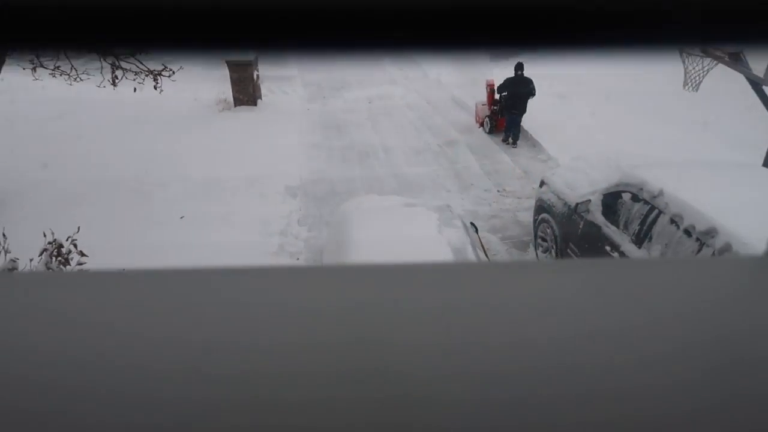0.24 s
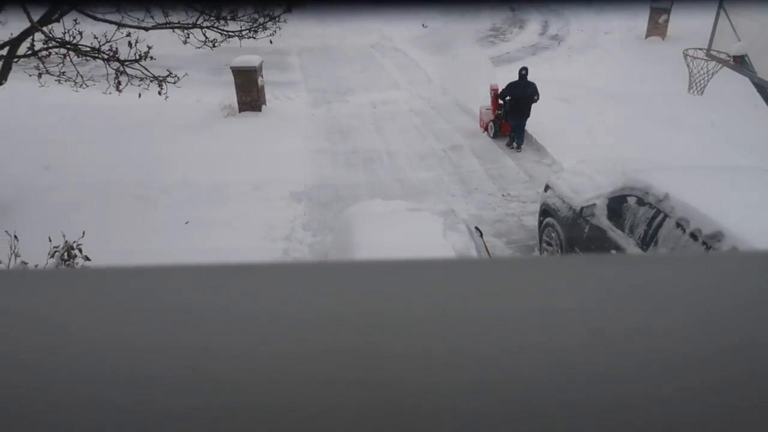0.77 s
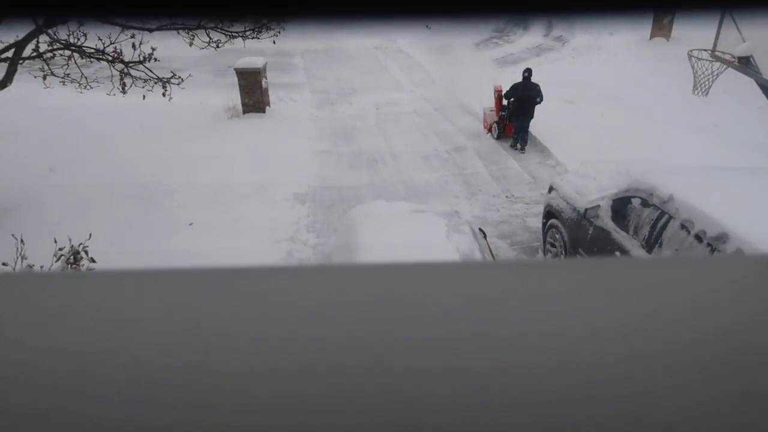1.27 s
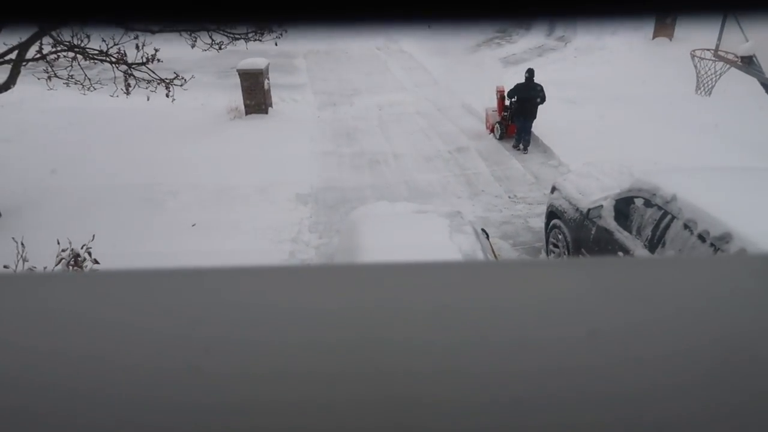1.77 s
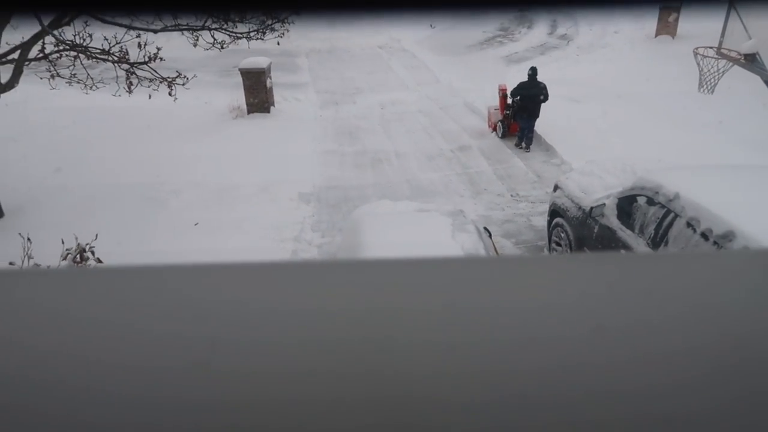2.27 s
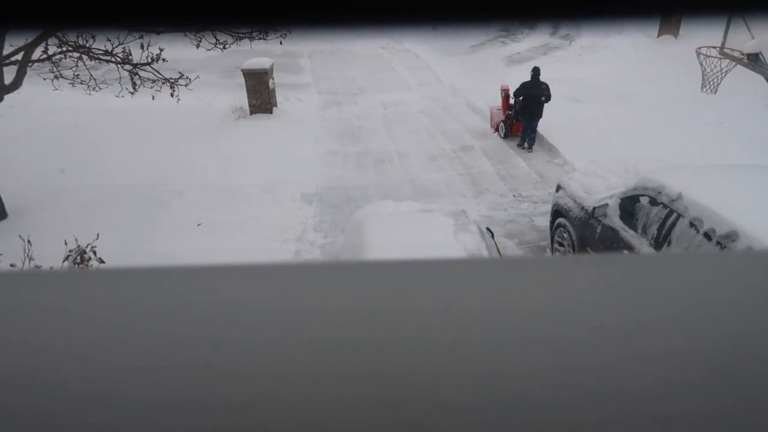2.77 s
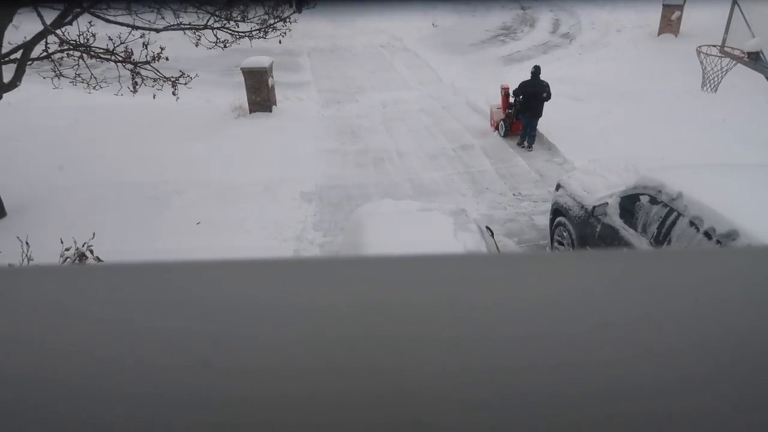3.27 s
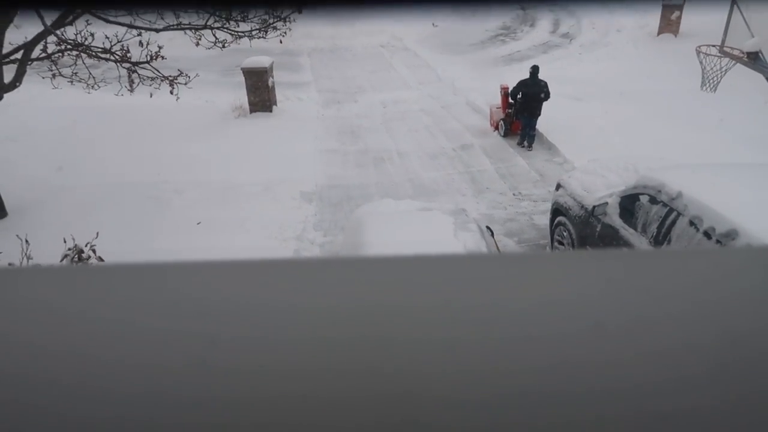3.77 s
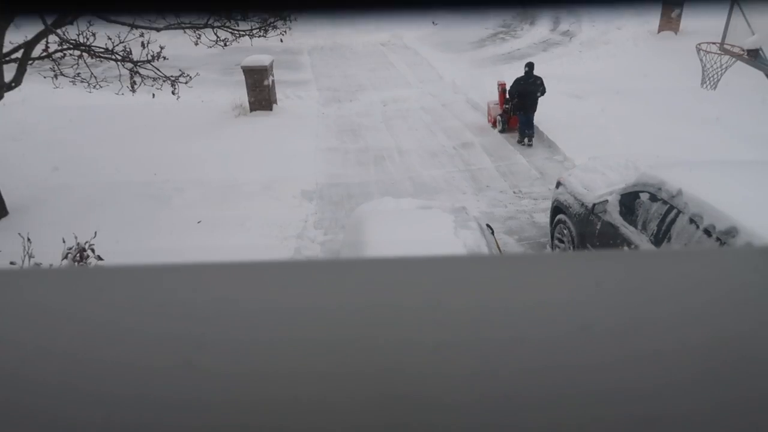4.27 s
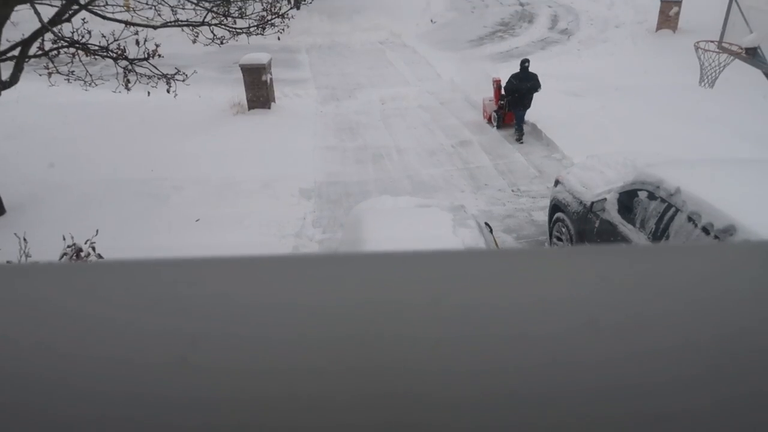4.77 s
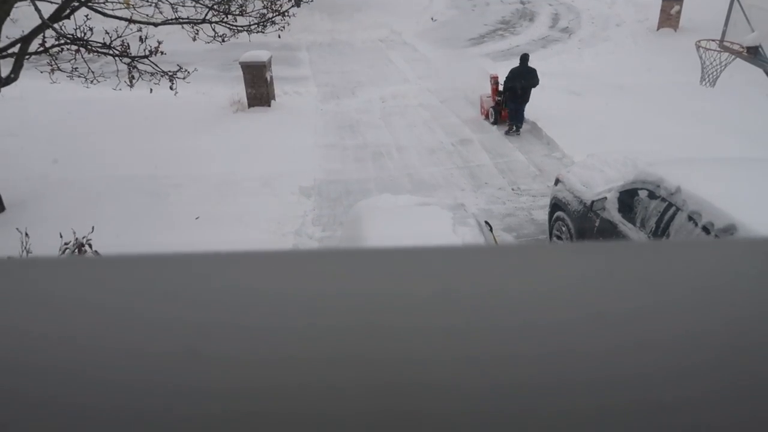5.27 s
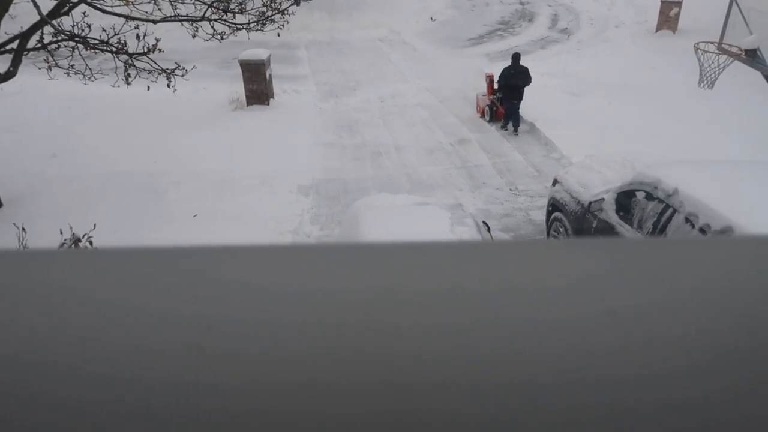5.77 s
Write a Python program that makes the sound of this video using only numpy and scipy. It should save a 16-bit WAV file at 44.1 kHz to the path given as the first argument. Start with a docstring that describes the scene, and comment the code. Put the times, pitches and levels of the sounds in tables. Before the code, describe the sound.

From inside a house, a single-cylinder snowblower is heard working down a snowy driveway, a muffled low drone with sheet-metal rattle and a wavering impeller whine. It holds steady for about four seconds, then drops slightly in pitch and grows thicker as the snow deepens. An appliance hums steadily indoors, two faint ticks come close by midway and another near the end, over soft microphone hiss.

```python
"""A single-cylinder snowblower works down a driveway, heard from indoors through an upstairs window.
Engine harmonics make a drone that sags and thickens in deeper snow; firings ring muffler, room and housing.
The impeller whines, lumps of snow knock in the rattling housing, and spray and rumble grow with the load.
Indoors an appliance hums in steady tones and three faint ticks ring a small hard object close by.
The microphone adds coloured hiss and a thin electronic whistle."""
import sys
import numpy as np
from scipy.fft import rfft, irfft, next_fast_len
from scipy.io import wavfile
from scipy.ndimage import map_coordinates

SR = 44100
rng = np.random.default_rng(int(sys.argv[2]) if len(sys.argv) > 2 else 0)


def file_out(sig):
    """Save sig as 16-bit WAV at sys.argv[1]."""
    # one column per channel
    cols = np.atleast_2d(sig).T
    # limit, then scale
    lim = np.clip(cols, -1, 1)
    pcm = np.round(lim * 32767).astype(np.int16)
    wavfile.write(sys.argv[1], SR, pcm)


N = 266364  # samples


def amp(db):
    """Decibels to gain."""
    return 10 ** (np.asarray(db) / 20)


def unit(x):
    """Scale to rms 1."""
    return x / np.sqrt(np.mean(x ** 2) + 1e-20)


def along(points, hz):
    """Read a table of (Hz, value) points along a log frequency axis."""
    point_hz, value = np.transpose(points)
    return np.interp(np.log(hz + 1), np.log(point_hz + 1), value)


def curves(rows):
    """One value per sample for each column after the time."""
    s, *columns = np.transpose(rows)
    return [np.interp(np.arange(N) / SR, s, column) for column in columns]


def wobble(rate):
    """A smooth random curve with rate knots a second."""
    knots = rng.standard_normal(int(N * rate / SR) + 4)
    coarse = np.arange(0, N + 64, 64)
    return np.interp(np.arange(N), coarse, map_coordinates(knots, [coarse * rate / SR]))


def filtered(x, response):
    """Multiply the spectrum of x by a complex response of frequency."""
    padded = next_fast_len(N + SR // 2)
    spectrum = rfft(x, padded) * response(np.fft.rfftfreq(padded, 1 / SR))
    return irfft(spectrum, padded)[..., :N]


def resonance(f, hz, width):
    """A causal resonance with steep skirts: two equal band-passes in a row, each of this width."""
    return (1j * f * width / (hz * hz - f * f + 1j * f * width)) ** 2


def tone(cycles):
    """A sinusoid of rms 1 from its running count of cycles."""
    return np.sqrt(2) * np.cos(2 * np.pi * cycles)


# Stereo width at the microphone: (frequency_hz, side_against_mid_db)
SIDE_WIDTH = [(60, -29), (170, -15.5), (300, -13.5), (500, -7), (1000, -4.5), (2000, 0), (4000, 1.5),
              (8000, 0), (13000, -0.5)]


def stereo(pair):
    """From mid and side: bass reaches both microphone ports alike, treble does not."""
    mid = pair[0]
    side = filtered(pair[1], lambda f: amp(along(SIDE_WIDTH, f)))
    return np.array([mid + side, mid - side])


def noise(spectrum):
    """Diffuse stereo noise of the given colour."""
    white = rng.standard_normal((2, N))
    return stereo(unit(filtered(white, lambda f: amp(along(spectrum, f)))))


# The engine under its governor, before jitter and hunting: (time_s, firing_rate_hz)
ENGINE_SPEED = [(0.0, 29.39), (0.2, 29.54), (0.4, 29.28), (0.62, 29.73), (0.9, 29.56), (1.4, 29.72),
                (2.0, 29.73), (2.4, 29.65), (3.1, 29.88), (3.5, 29.79), (3.8, 29.77), (4.15, 29.57),
                (4.45, 29.18), (4.8, 28.44), (5.25, 28.43), (5.7, 28.0), (6.04, 28.14)]


def snowblower(jitter=0.0049, hunting=0.0018, uneven_db=0.64):
    """Speed and load drive the engine's parts; the governor hunts a little and no two strokes are quite alike."""
    speed, = curves(ENGINE_SPEED)
    load = engine_load(speed)
    cycles = np.cumsum(speed) / SR + .27
    cycles = cycles + jitter * wobble(14) + hunting * wobble(3)  # both in firing periods
    strength = amp(uneven_db * wobble(FREE_HZ))
    engine = strength * drone(cycles, speed, load) + clatter(cycles, load)
    return engine + impeller() + lumps() + spray(load) + rumble(load)


FREE_HZ, LOADED_HZ = 29.91, 27.58  # firing rate in light and in deep snow
LOAD_CURVE = 1.11  # above 1, a slight droop means very little load


def engine_load(speed):
    """The governor lets the speed droop with the load: 0 in light snow, 1 in deep snow."""
    droop = (FREE_HZ - speed) / (FREE_HZ - LOADED_HZ)
    return np.clip(droop, 0, 1) ** LOAD_CURVE


# Exhaust drone before boom and waver: (multiple_of_firing_rate, light_snow_db, deep_snow_db)
DRONE_HARMONICS = [(2, -67.5, -43), (3, -44.5, -67), (4, -38, -43), (5, -38, -43.5), (6, -42, -45.5),
                   (7, -49, -38), (8, -51, -76.5), (9, -53, -44), (10, -46.5, -41.5), (12, -65, -87.5),
                   (14, -64.5, -79), (15, -74, -63.5), (16, -80, -51.5), (18, -64, -63.5), (19, -78, -56),
                   (24, -68, -74), (27, -76.5, -73), (28, -69, -79), (29, -71.5, -74), (33, -83.5, -82.5)]
# Room modes that boom when a harmonic slides onto them: (frequency_hz, width_hz, boost_db)
ROOM_MODES = [(169.8, 3.2, 10), (205.5, 3, 5), (238.5, 5, 9.5), (281.8, 5, 9), (292, 5, 2),
              (341.7, 5.5, 25), (706, 8, 3)]
# The loud boom near 280 Hz swells and fades, added to one harmonic: (time_s, level_db)
BOOM_LEVEL = [(4.3, 0), (4.45, 3.5), (4.68, 4), (4.84, -6), (4.98, -7), (5.07, 0), (5.17, -7), (5.34, 3),
              (5.46, 1), (5.55, -8), (5.62, 2), (5.67, 2), (5.715, -10), (5.77, 1), (5.9, 4.5), (5.97, 1),
              (6.01, -9)]
BOOM_MULTIPLE = 10
OVERTONE_BLUR, OVERTONE_WAVER_DB = .006, .6  # phase in cycles per loose multiple, level per its root


def drone(cycles, speed, load, waver_db=0.76):
    """Clean engine harmonics; the high ones arrive later and waver more."""
    smear, exhaust_lead, tight = .15, .18, 8  # cycles, cycles, highest tightly locked multiple
    out = np.zeros(N)
    for multiple, light_db, deep_db in DRONE_HARMONICS:
        k = round(multiple)
        boom_db = sum(db / (1 + (2 * (k * speed - hz) / width) ** 2) for hz, width, db in ROOM_MODES)
        if k == BOOM_MULTIPLE:
            boom_db = boom_db + curves(BOOM_LEVEL)[0]
        load_db = light_db + (deep_db - light_db) * load
        level = amp(load_db + boom_db + waver_db * np.sqrt(k) / 2 * wobble(3.98))
        loose = max(k - tight, 0)
        # even multiples follow the crank, odd ones only the exhaust: two uneven beats per firing
        lag = smear * loose ** 2 - exhaust_lead * (k % 2)
        level = level * amp(OVERTONE_WAVER_DB * np.sqrt(loose) * wobble(9.8))
        out += level * tone(k * cycles - lag + OVERTONE_BLUR * loose * wobble(12))
    return out


# Room, muffler and housing: (frequency_hz, width_hz, light_snow_db, deep_snow_db, roughness_0_to_1)
BODY_RESONANCES = [(58.4, 13, -56.5, -54, 0.95), (98, 1.5, -62, -38.5, 0.9), (181.6, 15, -48, -51, 1),
                   (197.7, 7.9, -60, -42.5, 0.91), (249.1, 13, -57, -37, 0.4),
                   (277.86, 15.5, -45.5, -44.5, 0.96), (333, 63, -68.5, -58.5, 0.7),
                   (468.5, 108, -57, -58.5, 0.7), (536.4, 34, -65.5, -66.5, 1), (751, 83, -70.5, -75, 0.8),
                   (1240, 950, -74, -60.5, 0.94), (3970, 200, -92.5, -73, .8), (5360, 470, -89, -76, 1)]


def clatter(cycles, load):
    """The firings shake muffler and housing; each resonance changes level with the load."""
    pulses, puffs = firings(cycles)
    body = sum(amp(light_db + (deep_db - light_db) * load) * ring(pulses, puffs, hz, width, rough)
               for hz, width, light_db, deep_db, rough in BODY_RESONANCES)
    return stereo(body + housing(cycles, pulses, puffs))


COMBUSTION_LEAD = .1  # combustion comes this share of a firing period before the exhaust thump


def firings(cycles, burst=0.11, between=0.32, scatter_db=2):
    """Each firing gives a direct pulse, in the middle only, and a diffuse burst of turbulence as mid and side."""
    since = (cycles + COMBUSTION_LEAD) % 1  # firing periods since combustion
    starts = np.flatnonzero(np.diff(since) < 0)
    pulses = np.zeros(N)
    pulses[starts] = amp(scatter_db * rng.standard_normal(N)[:len(starts)])
    puffs = rng.standard_normal((2, N)) * (between + np.exp(-since / burst))
    return np.array([unit(pulses), np.zeros(N)]), unit(puffs)


def ring(pulses, puffs, hz, width, rough):
    """One resonance kept ringing by the firings, at rms 1 in the middle."""
    rough = np.clip(rough, 0, 1)
    force = np.sqrt(1 - rough) * pulses + np.sqrt(rough) * puffs
    pair = filtered(force, lambda f: resonance(f, hz, width))
    return pair / np.std(pair[0])


# The sheet-metal housing's ringing: (time_s, level_db, main_mode_pitch_hz)
HOUSING_RATTLE = [(0.0, -63, 1312), (0.35, -60.5, 1312), (0.7, -67, 1325), (2.5, -66, 1310),
                  (3.1, -71, 1315), (4.3, -69.5, 1322), (4.75, -65, 1298), (5.12, -61.5, 1298),
                  (5.24, -61, 1328), (6.04, -62.5, 1328)]
# What the housing rings with, as relative levels: (frequency_hz, width_hz, level_db)
HOUSING_MODES = [(1300, 85, -1), (1470, 82, -17.5), (1583, 68, -14), (1915, 84, -13)]
RATTLE_FALL, RATTLE_RISE = .42, .12  # decay and attack of each shake, firing periods
RATTLE_SCATTER_DB = 1.6  # unevenness of the shakes


def housing(cycles, pulses, puffs, ring_db=-4.0, scrape_db=-7, wander=0.15):
    """Firings shake the sheet metal: its main mode flutters in time with the engine, over a looser buzz."""
    level_db, ring_hz = curves(HOUSING_RATTLE)
    since = (cycles + COMBUSTION_LEAD) % 1
    # the attack term is scaled so that each shake starts where the last one ended
    attack = (1 - np.exp(-1 / RATTLE_FALL)) * np.exp(-since / RATTLE_RISE)
    shake = (np.exp(-since / RATTLE_FALL) - attack) * amp(RATTLE_SCATTER_DB * wobble(FREE_HZ))
    ring_cycles = np.cumsum(ring_hz) / SR
    main = np.array([unit(shake * tone(ring_cycles + wander * wobble(FREE_HZ))) for _ in range(2)])
    buzz = sum(amp(db) * ring(pulses, puffs, hz, width, rough=0.58) for hz, width, db in HOUSING_MODES)
    return amp(level_db) * (amp(ring_db) * main + amp(scrape_db) * buzz)


# The impeller before its flutter: (time_s, whine_hz, level_db)
IMPELLER_WHINE = [(0.0, 467, -59), (0.15, 467, -60), (0.2, 479, -53), (0.42, 477, -55), (0.7, 469, -60),
                  (0.95, 464, -58), (1.1, 476, -57), (1.25, 462, -56), (1.45, 460, -54), (1.7, 475, -62),
                  (1.95, 461, -54), (2.2, 468, -60), (2.35, 476, -55), (2.55, 484, -54), (2.7, 470, -67),
                  (3.05, 472, -57), (3.35, 464, -56), (4.1, 471, -56), (4.87, 457, -55), (5.1, 468, -55),
                  (5.42, 464, -57), (5.55, 477, -55), (6.04, 478, -51)]
WHINE_FLUTTER_DB = 1.5


def impeller(flutter_hz=2.02):
    """The belt-driven impeller's whine wanders, swells and flutters as snow passes through it."""
    whine_hz, whine_db = curves(IMPELLER_WHINE)
    level = amp(whine_db + WHINE_FLUTTER_DB * wobble(7.2))
    return level * tone(np.cumsum(whine_hz + flutter_hz * wobble(19)) / SR)


# Lumps of snow knock on the housing: (peak_s, level_db)
SNOW_LUMPS = [(2.54, -57), (5.277, -56), (5.88, -49)]
LUMP_RISE_S, LUMP_FALL_S = .02, 0.14  # times to rise and to fall by 60 dB
LUMP_BRIGHT_DB = 4  # a lump favours the upper housing modes by this much per octave


def lumps():
    """Packed snow scrapes through the housing and rings it briefly."""
    t = np.arange(N) / SR
    force = sum(amp(db - 60 * np.maximum((s - t) / LUMP_RISE_S, (t - s) / LUMP_FALL_S))
                for s, db in SNOW_LUMPS)
    lowest_hz = HOUSING_MODES[0][0]

    def metal(f):
        """The housing modes, tilted towards the treble."""
        return sum(amp(db + LUMP_BRIGHT_DB * np.log2(hz / lowest_hz)) * resonance(f, hz, width)
                   for hz, width, db in HOUSING_MODES)

    grit = rng.standard_normal((2, N))
    return stereo(filtered(force * grit, metal) / np.std(filtered(grit, metal)))


def spray(load, spray_db=-74):
    """Snow hisses through the chute, louder in proportion to the load."""
    grit = filtered(rng.standard_normal((2, N)), lambda f: resonance(f, hz=4630, width=2500))
    return stereo(amp(spray_db + 1.9 * wobble(14)) * load * unit(grit))


# Colour of the low rumble: (frequency_hz, relative_level_db_per_hz)
RUMBLE_SPECTRUM = [(20, -22), (30, -6), (45, -4), (58, -5), (66, -9), (80, -5), (100, -4), (125, -12),
                   (142, -11), (152, -1), (165, -8), (192, -1), (215, -15), (232, -17), (245, -10),
                   (260, -14), (320, -14), (600, -35), (2000, -120)]
RUMBLE_DB, RUMBLE_LOAD_DB = -44.5, 5.5  # level in light snow, its rise at full load


def rumble(load):
    """A low rumble that swells as the machine labours."""
    return amp(RUMBLE_DB + RUMBLE_LOAD_DB * load) * noise(RUMBLE_SPECTRUM)


# Taps close by: (start_s, level_db, strongest_hz, fall_off_db_per_octave, pitch_ratio)
TICK_TAPS = [(3.009, -37.3, 870, .5, 1), (3.1112, -34.2, 3250, 9, 1), (5.459, -37.5, 2750, 19, .88)]
# What the ticks ring with, before the pitch ratio: (frequency_hz, level_db, t60_s)
TICK_RINGING = [(700, -7, .07), (900, 3, .032), (1040, -9, .025), (1160, -13, .035), (1660, -7, .028),
                (2400, -9, .02), (2800, -13, .013), (3130, -8.5, .014), (3480, -12, .018), (3820, -22, .02)]
TICK_ATTACK_S = .0006


def ticks():
    """Three taps ring a small hard object close by; each contact favours the modes around its own pitch."""
    out = np.zeros((2, N))
    for s, db, centre_hz, focus_db, pitch in TICK_TAPS:
        t = np.maximum(np.arange(N) / SR - s, 0)
        for hz, level_db, t60 in TICK_RINGING:
            off_centre_db = focus_db * np.abs(np.log2(hz * pitch / centre_hz))
            fall = amp(db + level_db - off_centre_db - 60 * t / t60)
            attack = 1 - np.exp(-t / TICK_ATTACK_S)
            out += fall * attack * np.sin(2 * np.pi * (hz * pitch * t + rng.random((2, 1))))
    return stereo(out)


# The indoor appliance's motor tones, before their waver: (frequency_hz, level_db)
MOTOR_TONES = [(30.2, -60), (36.9, -54), (45.3, -50.5), (55.3, -53), (59.9, -53), (73.7, -46.5),
               (104.9, -50.5), (152.3, -53), (157.4, -47), (191, -57.5), (394, -70)]
HUM_WAVER_DB = 1.8


def appliance(drift=0.02):
    """Motor tones that waver a little, and a steady mains hum close to the engine's fourth harmonic."""
    mains_hz, mains_db = 120, -41
    t = np.arange(N) / SR
    motor = sum(amp(db + HUM_WAVER_DB * wobble(1.6)) * tone(hz * t + rng.random() + drift * wobble(1.1))
                for hz, db in MOTOR_TONES)
    return motor + amp(mains_db) * tone(mains_hz * t)


# Colour of the microphone hiss: (frequency_hz, relative_level_db_per_hz)
HISS_SPECTRUM = [(200, -24), (600, 4), (1000, 0), (1500, -4.5), (2200, -7), (3500, -10.5), (5200, -14.5),
                 (7000, -18.5), (10000, -23), (12500, -27), (14000, -30.5), (15000, -33)]


def hiss(hiss_db=-59.0):
    """The microphone's own noise, steady and diffuse."""
    return amp(hiss_db) * noise(HISS_SPECTRUM)


def whistle(whistle_hz=13007, whistle_db=-95.5):
    """A thin electronic whistle: one steady sinusoid."""
    return amp(whistle_db) * tone(whistle_hz * np.arange(N) / SR)


def scene():
    """The snowblower outside and the indoor sounds, over hiss and whistle."""
    return snowblower() + appliance() + ticks() + hiss() + whistle()


TOP_HZ = 14950  # band limit of the microphone


def record(dry):
    """Soft ends; the microphone passes nothing above its band limit."""
    to_nearest_end_s = np.minimum(np.arange(N), np.arange(N)[::-1]) / SR
    fade = np.clip(to_nearest_end_s / .004, 0, 1)
    return filtered(dry * fade, lambda f: f < TOP_HZ)


dry = scene()
out = record(dry)
file_out(out)
```